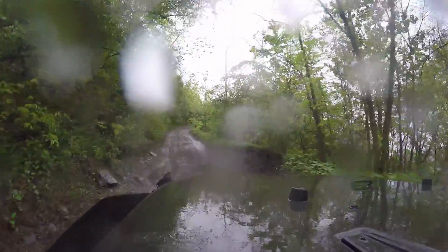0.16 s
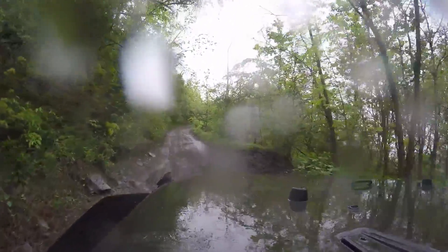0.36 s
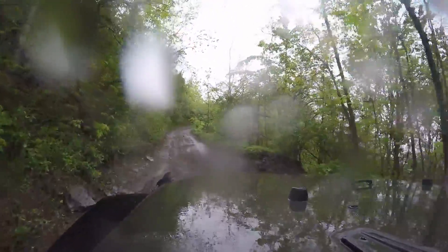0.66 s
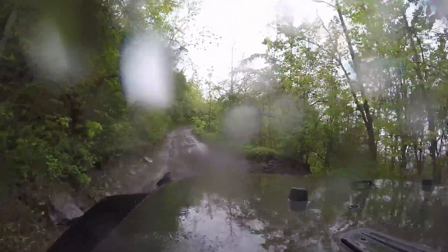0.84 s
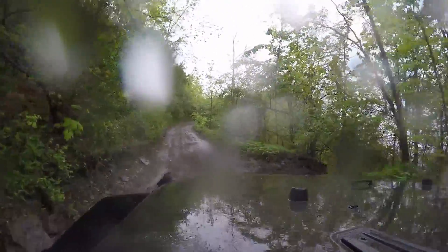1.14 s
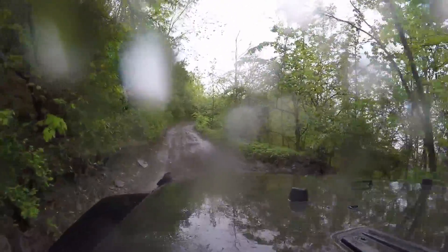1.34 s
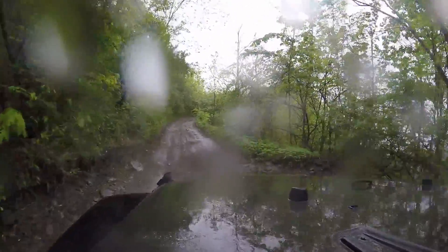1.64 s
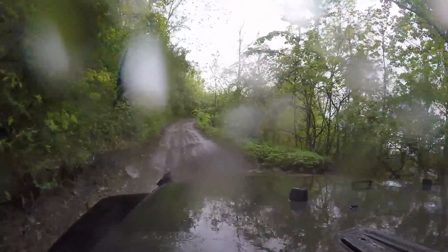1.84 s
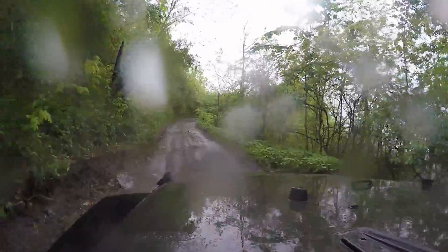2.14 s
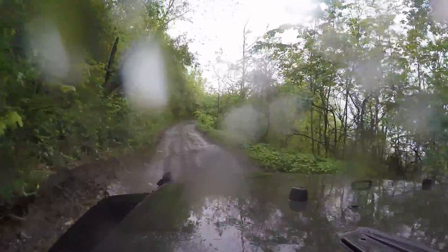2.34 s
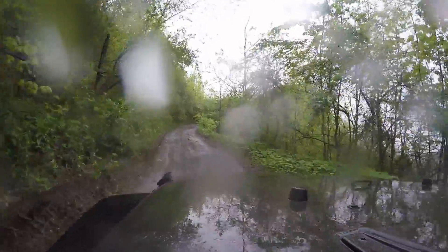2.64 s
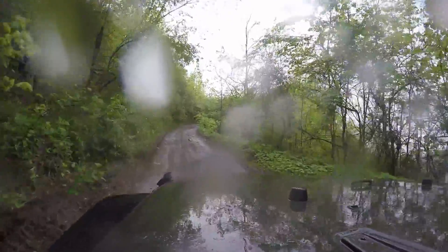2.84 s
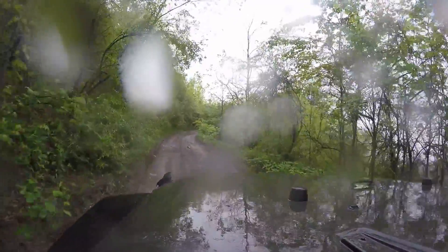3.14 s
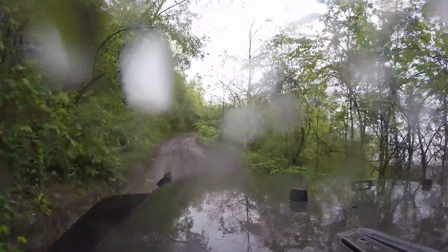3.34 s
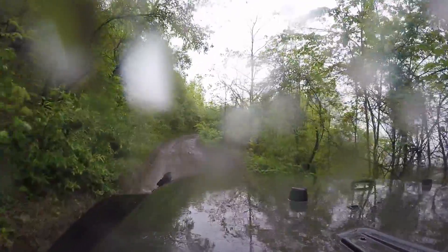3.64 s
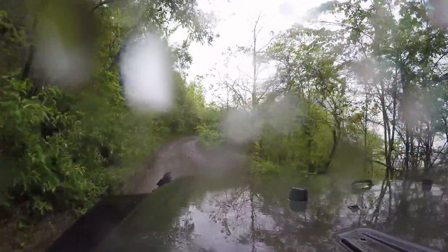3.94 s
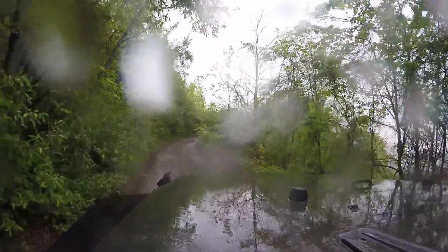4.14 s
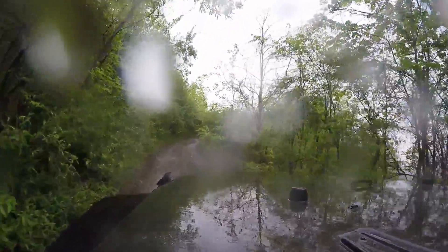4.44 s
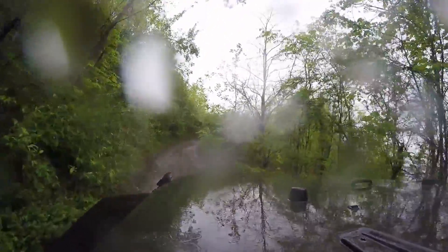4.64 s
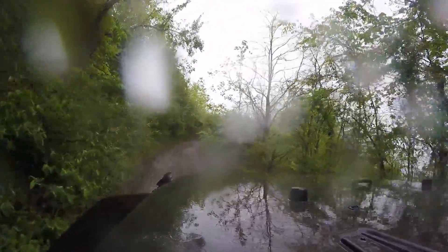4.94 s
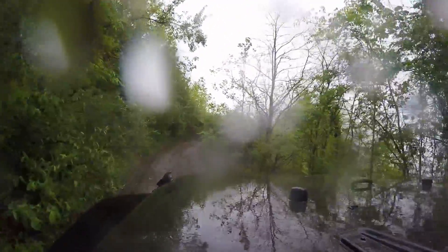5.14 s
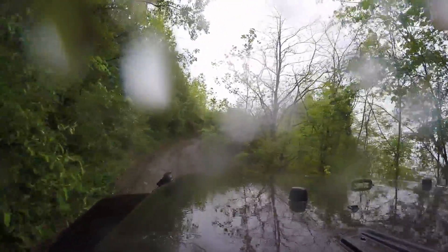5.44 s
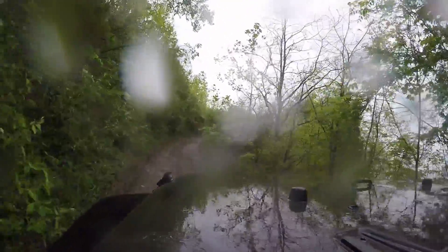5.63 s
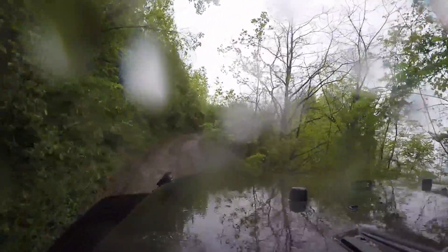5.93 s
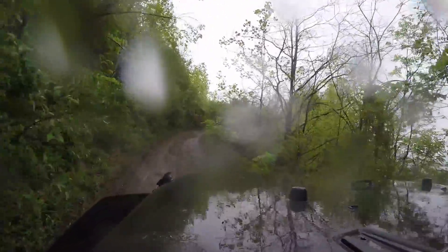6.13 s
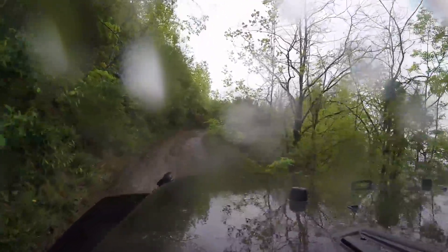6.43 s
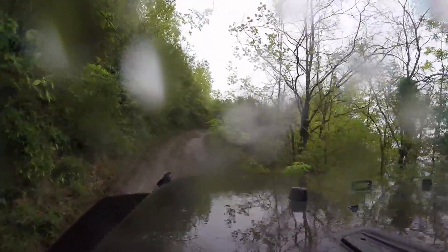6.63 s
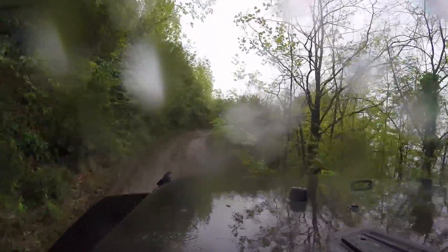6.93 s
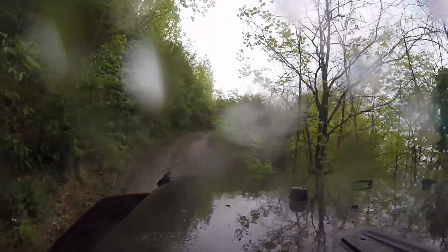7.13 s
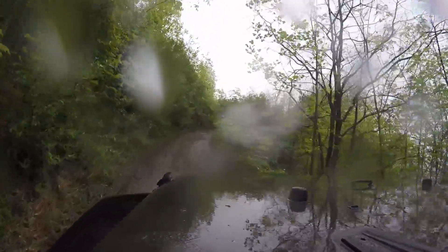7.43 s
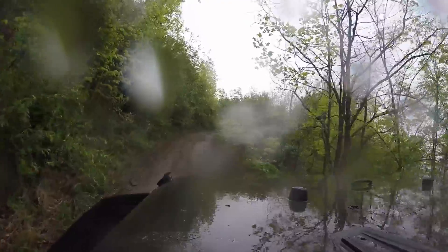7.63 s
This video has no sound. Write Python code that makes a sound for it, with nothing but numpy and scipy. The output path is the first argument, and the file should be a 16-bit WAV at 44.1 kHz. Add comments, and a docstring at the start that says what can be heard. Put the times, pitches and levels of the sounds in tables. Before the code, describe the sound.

Heavy low-frequency shaking and a soft engine drone dominate, with irregular bright raindrop ticks, faint wet hiss and a few rattling thumps.

```python
"""The body of a four-wheel-drive vehicle shakes at its lowest mode as it crawls along a muddy trail in the rain.
Engine firing orders swell as they cross body resonances, and noise bands at the body modes form the rumble.
Coloured noise with fine grains makes the hiss of rain and tyre spray; minimum-phase pulses make the drops.
Knocks, rustle and thumps are decaying panel and floor pan modes, with noise bursts of loose parts and water.
All is heard by one microphone in a sealed housing on the roof."""
import sys
import numpy as np
from scipy import signal
from scipy.fft import rfft, irfft, next_fast_len
from scipy.io import wavfile
from scipy.ndimage import uniform_filter1d

SR = 44100
rng = np.random.default_rng(int(sys.argv[2]) if len(sys.argv) > 2 else 0)


def unload_wav(signal):
    """Save mono or channel-first audio to the path in sys.argv[1] as 16-bit WAV at rate SR, clipped to [-1, 1]."""
    wavfile.write(
        sys.argv[1],
        SR,
        np.round(np.clip(np.atleast_2d(signal).T, -1, 1) * 32767).astype(np.int16),
    )


N = 343098

# Shudders of the body, each dying away as the next begins: start [t/s], rms level at the crest [level/dB],
# share of its length spent rising [1]
SHUDDERS = [(-0.03, -11.5, 0.56), (0.11, -17.5, 0.24), (0.36, -12.5, 0.78), (0.78, -13, 0.41),
            (1.0, -14.5, 0.19), (1.3, -18.5, 0.44), (1.42, -11.5, 0.35), (1.79, -14, 0.23),
            (2.5, -15.5, 0.28), (2.8, -16.5, 0.74), (2.99, -12.5, 0.37), (3.53, -23.5, 0.75),
            (3.76, -22.5, 0.39), (4.05, -19.5, 1), (4.24, -16.5, 0.5), (4.45, -13, 0.19), (4.94, -15, .45),
            (5.2, -13.5, 0.39), (5.4, -15.5, 0.64), (6.46, -12.5, 0.66), (6.92, -14, 0.4),
            (7.13, -12.5, 0.4), (7.33, -13.5, 0.92)]
# Pitch of the shake: time [t/s], frequency [f/Hz]
SHAKE_PITCH = [(0, 24.77), (5.2, 25.06), (5.4, 26.18), (7.78, 26.04)]
# Engine: time [t/s], firing rate [f/Hz], load on the first order [level/dB],
# second, third and fourth orders [level/dB each]
ENGINE_ORDERS = [(0.05, 46.5, -3.5, -60, -56.5, -79), (0.72, 47, -12, -61, -49.5, -50.5),
                 (0.85, 46.53, -13, -61, -62, -43.5), (1.12, 42.36, -10, -52, -56, -41.5),
                 (1.29, 36.8, -2.5, -38, -39, -64), (1.62, 34.07, -6, -33.5, -40.5, -47.5),
                 (2.5, 33.26, 1.5, -51, -42, -42), (2.95, 33.57, -21, -34.5, -39, -57),
                 (3.19, 36.1, -2, -56, -36.5, -53.5), (3.53, 44.46, 0.5, -56, -61, -40),
                 (3.76, 49.48, 0, -35.5, -51, -57), (4.07, 54.67, 8, -40, -52.5, -50.5),
                 (4.58, 57.65, -10, -45, -50.5, -69), (5.5, 58.26, -15, -44.5, -53.5, -65),
                 (5.9, 58.43, 2, -49, -50, -45.5), (6.12, 48.18, -21, -47, -60, -57),
                 (6.24, 43.07, -2, -52, -48, -33.5), (6.63, 36.02, -10, -46, -43, -61),
                 (6.86, 36.32, -1, -61, -52, -49), (7.1, 39.8, -4, -58, -50, -43),
                 (7.38, 43.43, 5, -68, -50, -34.5), (7.72, 47.24, -13, -62, -60, -45)]
# Body modes that carry the rumble: centre [f/Hz], width [f/Hz], relative strength [level/dB]
BODY_MODES = [(14.6, 10.5, 11.5), (36, 11, 6.5), (54.9, 15.6, -3), (71.7, 15.8, -4.5), (79.37, 4.16, -1.5),
              (107, 13, -9.5), (138.7, 20.3, -11.5), (183.5, 31, -17), (221.4, 33, -21), (268, 46, -22),
              (345, 30, -24), (414, 72, -28), (632, 4.1, -31.5), (800.7, 15, -26.5), (1028.7, 17.6, -29),
              (1768, 33, -25)]
# Wet trail under the tyres: time [t/s], hiss [level/dB], spray [level/dB], before flicker
TRAIL_LEVELS = [(0.0, -48.5, -59), (0.87, -48.5, -60.5), (1.17, -47.5, -58.5), (1.41, -48.5, -56.5),
                (2.51, -47, -57.5), (2.79, -47.5, -60.5), (3.03, -49.5, -62), (3.25, -49.5, -59),
                (3.44, -46, -61), (3.62, -50, -62.5), (4.72, -46.5, -65), (5.11, -51, -64.5),
                (5.92, -49, -63.5), (6.52, -48.5, -64), (7.34, -50.5, -66), (7.78, -49, -66.5)]
# Wet hiss as the housing passes it: frequency [f/Hz], relative density [level/dB per Hz]
HISS_SPECTRUM = [(260, -16), (450, -9.5), (531, -8.5), (614, -2), (791, -3.5), (906, -8), (1050, -5.5),
                 (1300, -7.5), (1520, -11), (1770, 2.5), (1900, 5), (2420, -3.5), (2640, -8.5), (3370, -6),
                 (3700, -17.5), (3950, -34), (4600, -34), (5980, -52), (10100, -120)]
# Spray and far rain: frequency [f/Hz], relative density [level/dB per Hz]
SPRAY_SPECTRUM = [(2350, -21), (4000, -1.5), (4680, -2.5), (6440, -8), (14200, -16.5), (15000, -18),
                  (15500, -48), (15700, -61), (16000, -50)]
# Clear drops on the housing: time [t/s], peak [level/dB], pitch where it lands [f/Hz],
# bright modes [level/dB], dull modes [level/dB]
CLEAR_DROPS = [(0.116, -37, 1770, -30, -25), (0.402, -39, 4230, -26, -35), (0.428, -30.5, 1770, -27, -28),
               (0.535, -15.5, 2150, -12, -22), (0.588, -26.5, 1810, -40, -17), (0.613, -31, 3420, -40, -30),
               (0.695, -30.5, 3860, -30, -30), (0.773, -21, 2160, -42, -32), (0.83, -33, 3200, -40, -30),
               (0.994, -15, 2070, -25, -19), (1.144, -32, 1830, -19, -22), (1.265, -21.5, 3000, -18.5, -16),
               (1.354, -6, 2500, -17.5, -21.5), (1.499, -30, 1730, -42, -26),
               (1.64, -10.5, 1730, -22.5, -19.5), (1.653, -21, 2820, -27, -21), (1.68, -26, 2700, -28, -14),
               (1.844, -25.5, 4550, -7, -16), (2.004, -23, 4600, -12, -35), (2.033, -20, 3930, -20, -20),
               (2.308, -28, 2366, -13, -30), (2.371, -27, 1910, -42, -34), (2.461, -23, 2804, -36, -17),
               (2.659, -18, 2814, -46, -30), (2.68, -22, 1940, -40, -14), (2.691, -25, 3020, -20, -13),
               (2.813, -26.5, 1950, -45, -35), (3.026, -26, 1720, -39, -34), (3.104, -30, 1910, -36, -32),
               (3.335, -27, 3040, -2, -26), (3.36, -27.5, 2600, -3, -27), (3.433, -36, 3800, -35, -30),
               (3.535, -27.5, 1787, -44, -12), (3.804, -19, 4060, -18, -18), (3.892, -29.5, 4060, -24, -17),
               (3.936, -18.5, 2098, -47, -34), (4.249, -26.5, 1746, -19, -23),
               (4.314, -8.5, 3755, -26.5, -12), (4.407, -32, 2770, -38, -24), (4.469, -5, 2570, -18, -21),
               (4.583, -31, 2480, -38, -21), (4.657, -46, 4500, -8, -30), (4.672, -29.5, 3820, -45, -16),
               (4.705, -33, 3415, -38, -27), (4.768, -32, 2445, -42, -32), (4.868, -25.5, 2210, -24, -6.5),
               (4.967, -22, 2003, -27, -36), (5.098, -34, 1900, -15, -24), (5.428, -23.5, 3910, -44, -30),
               (5.443, -28, 2284, -39, -24), (5.639, -29, 2002, -40, -28), (5.67, -21, 4630, -18, -17),
               (5.691, -37, 2400, -9, -28), (5.8, -46, 4500, -2, -30), (5.845, -42, 4460, -2, -30),
               (5.988, -28, 2410, -15, -24), (6.001, -38.5, 4500, -8, -30), (6.011, -32, 4160, -16, -26),
               (6.256, -40, 4320, -18, -30), (6.278, -28, 4300, -7, -28), (6.297, -38, 4564, -25, -30),
               (6.45, -38, 4500, -23, -30), (6.455, -23.5, 2230, -44, -31), (6.621, -22.5, 3750, -11, -35),
               (6.803, -23, 835, -44, -5), (6.909, -2.5, 1660, -7, -11.5), (6.96, -27, 4200, -10, -30),
               (7.1, -24, 1920, -47, -27), (7.161, -36, 4300, -22, -30), (7.296, -47, 2700, -38, -28),
               (7.504, -32, 3753, -10, -5), (7.577, -24, 2020, -44, -13), (7.637, -14, 1950, -24.5, -39)]
# Housing modes: frequency [f/Hz], relative strength [level/dB], 60 dB decay time [t/s]
HOUSING_MODES = [(524.1, -13, 0.0087), (870, -3, 0.018), (1240, 2, 0.0061), (1720, 8.5, 0.014),
                 (1925, 0, 0.034), (2404, 6, 0.017), (2795, 0, 0.016), (3110, -2, 0.023),
                 (3570, 1.5, 0.018), (3870, -3, 0.015), (4540, -6.5, 0.022), (5030, 4.5, 0.003),
                 (5960, -1.5, 0.0066), (6970, -4, 0.01), (7650, -4.5, 0.0075), (8340, -6, 0.0082),
                 (9100, -10, 0.0068), (9800, -5, 0.006), (10800, -5.5, 0.0046), (12200, -3.5, 0.0039),
                 (13800, -14, 0.0023), (15000, -5.5, 0.003)]
# Knocks, rustle and thumps of panels and floor; close rows can form one rustle or thump:
# time [t/s], nominal peak [level/dB], relative dull part [level/dB], floor boom [level/dB],
# floor knock [level/dB], ring length share [1], favoured dull and bright modes [f/Hz each]
KNOCKS = [(0.503, -35.5, -18, -70, -71, 1, 800, 2110), (0.56, -34, -22, -60, -58, 0.97, 800, 2100),
          (0.601, -29, -13.5, -50, -69, 1, 810, 2410), (0.655, -35, -7, -50, -60, 0.52, 800, 2100),
          (1.609, -36.5, 7, -19, -34.5, 0.72, 700, 1900), (1.633, -36, -19, -20, -39, 0.83, 700, 1920),
          (1.66, -31.5, -34, -16, -35.5, 0.68, 700, 1940), (1.689, -34, -6, -17, -44, 0.39, 700, 3200),
          (1.722, -40, -10, -24, -35, 0.82, 700, 1900), (1.975, -17.5, -11.5, -48, -39, 0.63, 1042, 2400),
          (2.055, -20, -3, -12, -18, 0.45, 820, 2130), (2.456, -33, 2, -60, -57, .5, 796, 2420),
          (2.66, -41, -20, -34, -61, 0.41, 800, 2800), (3.225, -32.5, -17, -31, -38, 0.63, 800, 1880),
          (3.383, -20.5, -5, -23.5, -35, 0.36, 647, 2360), (3.477, -36, -8, -60, -60, .6, 1035, 3400),
          (3.536, -33.5, -2, -60, -65, 0.34, 805, 1720), (4.903, -30.5, -21, -44, -65, 0.7, 800, 2400),
          (5.515, -34, -6, -60, -63, 0.88, 801, 1940), (5.575, -33, -20, -60, -60, 0.49, 780, 1900),
          (6.172, -10.5, -18, -22, -23, 0.82, 1110, 2300), (6.374, -30, -8, -45, -66, 0.38, 808, 1900),
          (6.453, -29, -12.5, -57, -55, 0.99, 657, 2300), (7.526, -36.5, -13, -60, -62, 1, 800, 1903),
          (7.623, -33.5, -40, -50, -49, 0.89, 800, 2100)]
# Panel modes: frequency [f/Hz], relative strength [level/dB], full 60 dB decay time [t/s]
PANEL_MODES = [(644, -6, 0.45), (706, -19, 0.15), (785, -14, 0.53), (821, -12, 0.4), (1050, -12, 0.38),
               (1110, -30, 0.27), (1210, -17, 0.21), (1404, -11.5, 0.34), (1674, -6.5, 0.32),
               (1705, -14, 0.21), (1782, 1.5, 0.42), (1866, -5.5, 0.32), (1950, -11, 0.33),
               (1950, -10, .25), (2066, -3, 0.25), (2200, -12, 0.17), (2333, -4, 0.14), (2355, -4.5, 0.18),
               (2448, -6, 0.21), (2810, -7.5, 0.14), (3200, -17, 0.12), (3390, -22, 0.14),
               (3500, -16, 0.14), (3820, -14.5, 0.16), (4200, -22, 0.17), (4500, -31, 0.11),
               (5500, -19, 0.066), (5510, -23, 0.12)]
# Floor pan modes: frequency [f/Hz], relative strength [level/dB], full 60 dB decay time [t/s]
PAN_MODES = [(107, 4.5, 0.38), (136, 4, 0.267), (163, -12.5, 0.088), (191, -4.5, 0.16), (237, -5, 0.21),
             (275.6, 2, 0.25), (333.6, 5, 0.28), (364, -4.5, 0.62), (428, -15.5, 0.69), (480, -49, 0.033)]

# Shake; a small fullness exponent gives a flat top, and the gap is the least level, relative to the crest
SHUDDER_END_S, SHUDDER_FULLNESS, SHUDDER_GAP_DB = 7.95, 0.96, -34
# First order at load 0, rate the mounts pass best, and half-gain distance from it
FIRING_DB, FIRING_BEST_HZ, FIRING_REACH_HZ = -20, 38.4, 6.55
RUMBLE_DB = -26.5
# Drops: middle modes at the landing pitch and their fall away from it
LANDING_DB, FALL_DB_PER_OCTAVE, FALL_MOST_DB = -12.5, 15, 9.5
SOFT_ABOVE_HZ, SOFT_DB_PER_OCTAVE = 8700, 8   # water is a soft striker: the highest modes get less
OWN_DB, OWN_T60_S = -11.5, 0.014   # the patch of housing under the drop rings at the landing pitch
SKIRT_OCTAVES = 0.32   # how far from its pitch a housing mode is still heard
SNAP_DB, SNAP_OCTAVES = -18.5, 0.54   # the drop's own broad snap, against the strongest part
SPLIT_SHARE, SPLIT_S = 0.5, 0.0012   # the drop breaks up: strength and spread of the second contact
PATTER_PER_S, PATTER_DB, PATTER_CLUMP_DB = 88, -49.5, 2.5   # median rate, least peak, spread of the rate
# Knocks
FAVOUR_DB, FAVOUR_OCTAVES = 9, 0.051   # panel modes near the favoured pitches ring louder
TICK_DB = -3   # first contact of a knock, heard through the housing like a dull drop
SPLASH_DB, SPLASH_T60_S = -39, 0.14   # water thrown off the struck panel, against the knock's peak


def amp(db):
    """Logarithmic level: decibels to amplitude gain."""
    return 10 ** (np.asarray(db) / 20)


def rms_one(x):
    """Normalisation of power: scales a signal to unit rms."""
    return x / np.sqrt(np.mean(x ** 2) + 1e-20)


def in_time(rows):
    """Linear interpolation: table columns become curves with one value a sample."""
    s, *columns = np.transpose(rows)
    return [np.interp(np.arange(N) / SR, s, c) for c in columns]


def drift(rate_hz):
    """Low-passed noise: a random curve of spread 1 from two equal poles at rate_hz."""
    pole = np.exp(-80 * np.pi * rate_hz / SR)   # one step spans 40 samples
    noise = rng.standard_normal(N // 40 + 2002)
    slow = signal.lfilter([1], [1, -2 * pole, pole * pole], noise)[2000:]
    return np.interp(np.arange(N) / 40, np.arange(len(slow)), rms_one(slow))


def coloured(x, spectrum):
    """Spectral shaping: multiplies a dense signal's spectrum by a level curve, then sets rms 1."""
    size = next_fast_len(N)
    hz, db = np.transpose(spectrum)
    log_hz = np.log(np.arange(1, size // 2 + 2) * SR / size)
    gain = amp(np.interp(log_hz, np.log(hz), db, -90, -90))
    return rms_one(irfft(rfft(x, size) * gain, size)[:N])


def add(out, s, sound):
    """Superposition: mixes a short sound in at time s."""
    i = round(s * SR)
    out[i:i + len(sound)] += sound[:N - i]


def struck(hz, db, t60, length_s, signs=None):
    """Modal superposition: decaying sines start together, with chance signs unless given; peak 1."""
    t = np.arange(round(length_s * SR)) / SR
    decay = amp(db[:, None] - 60 * t / t60[:, None])
    rings = decay * np.sin(2 * np.pi * hz[:, None] * t)
    if signs is None:
        signs = rng.choice([-1, 1], len(hz))
    sound = rings.T @ signs
    return sound / np.abs(sound).max()


def shake():
    """Amplitude modulation: the body's lowest mode sounds as a near sine whose level swells and sinks smoothly."""
    t = np.arange(N) / SR
    (hz,) = in_time(SHAKE_PITCH)
    start, db, rise = np.transpose(SHUDDERS)
    now = np.clip(np.searchsorted(start, t) - 1, 0, None)
    length = np.diff(np.append(start, SHUDDER_END_S))
    gone = np.clip((t - start[now]) / length[now], 0, 1)
    crest = np.clip(rise, 0.1, 0.9)[now]
    swell = np.sin(np.pi / 2 * np.minimum(gone / crest, (1 - gone) / (1 - crest))) ** SHUDDER_FULLNESS
    level = amp(db)[now] * np.maximum(swell, amp(SHUDDER_GAP_DB))
    smooth_level = uniform_filter1d(level, size=1800)   # about 41 ms
    return np.sqrt(2) * smooth_level * np.sin(2 * np.pi * np.cumsum(hz) / SR)


def engine():
    """Forced resonance: firing orders are loudest as they cross body modes; uneven burning makes them waver."""
    hz, load_db, *upper_db = in_time(ENGINE_ORDERS)
    mounts = 1 / (1 + ((hz - FIRING_BEST_HZ) / FIRING_REACH_HZ) ** 2)
    gains = [amp(FIRING_DB + load_db) * mounts, *amp(upper_db)]
    turn = 2 * np.pi * np.cumsum(hz) / SR
    out = np.zeros(N)
    for order, gain in enumerate(gains, 1):
        responses = [1 / np.hypot(1, (order * hz - mode_hz) / width)
                     for mode_hz, width, _ in BODY_MODES[1:8]]
        resonance = np.max(responses, axis=0) ** 0.68
        waver = amp(1.2 * drift(4.1))
        tone = np.sin(order * turn + 0.15 * drift(3.9))
        out += np.sqrt(2) * resonance * gain * waver * tone
    return out


def rumble(level_db):
    """Random excitation of resonances: rough ground drives every body mode with noise of its own."""
    out = np.zeros(N)
    for hz, width, db in BODY_MODES:
        band = signal.butter(2, [hz - width / 2, hz + width / 2], "band", fs=SR, output="sos")
        noise = signal.sosfilt(band, rng.standard_normal(N + SR))[SR:]   # skip the filter's first second
        out += amp(db + 2.84 * drift(3.1)) * rms_one(noise)
    return amp(level_db) * out / np.sqrt(len(BODY_MODES))


def wet_noise(spectrum, level_db, grain_per_s, grain_db, flicker_db):
    """Shot noise over a continuum: fine splashes of uneven size join a smooth, flickering hiss."""
    sizes = amp(3.4 * np.minimum(rng.exponential(1, N), 4)) * rng.choice([-1, 1], N)
    grains = rms_one(sizes * (rng.random(N) < grain_per_s / SR))
    mix = rng.standard_normal(N) + amp(grain_db) * grains
    flicker = drift(33.0) + 2.0 * drift(29.7)
    return amp(level_db + flicker_db * flicker) * coloured(mix, spectrum)


def minimum_phase(power):
    """Minimum phase: folding the cepstrum puts all energy of a power spectrum as early as it can come."""
    cepstrum = irfft(np.log(power) / 2)
    cepstrum[1:1024] *= 2
    return irfft(np.exp(rfft(cepstrum[:1025], 2048)))[:1400]


def drop(peak_db, pitch_hz, bright_db, dull_db):
    """Local modal excitation: modes near the landing pitch are favoured, over the drop's broad snap."""
    hz, db, t60 = np.transpose(HOUSING_MODES)
    fall_db = np.minimum(FALL_DB_PER_OCTAVE * np.abs(np.log2(hz / pitch_hz)), FALL_MOST_DB)
    share_db = np.select([hz < 1400, hz > 5000], [dull_db, bright_db], LANDING_DB - fall_db)
    levels = db + share_db + rng.normal(0, 2.0, len(hz))
    levels -= SOFT_DB_PER_OCTAVE * np.maximum(np.log2(hz / SOFT_ABOVE_HZ), 0)
    hz = hz * rng.normal(1, 0.012, len(hz))
    hz = np.append(hz, pitch_hz)
    levels = np.append(levels, OWN_DB)
    t60 = np.append(t60, OWN_T60_S)

    grid = np.arange(1, 1026)[:, None] * SR / 2048
    damping = np.log(1000) / t60
    modes = amp(2 * levels) / (damping ** 2 + (2 * np.pi * (grid - hz)) ** 2)
    skirt = 1 + (np.log2(grid / hz) / SKIRT_OCTAVES) ** 4
    power = np.sum(modes / skirt, axis=1)
    snap = np.exp(-(np.log2(grid[:, 0] / pitch_hz) / SNAP_OCTAVES) ** 2)
    power += power.max() * amp(2 * SNAP_DB) * snap   # doubled dB: amp() then gives a power ratio

    sound = minimum_phase(power)
    lag = 4 + int(rng.random() * SPLIT_S * SR)
    sound[lag:] += SPLIT_SHARE * sound[:-lag].copy()
    return amp(peak_db) * rng.choice([-1, 1]) * sound / np.abs(sound).max()


def rain():
    """Random arrivals: small drops patter in clumps at a drifting rate, among the clear drops."""
    out = np.zeros(N)
    for s, *kind in CLEAR_DROPS:
        add(out, s + 0.0011, drop(*kind))   # the pulse begins about a millisecond after the listed time
    chance = PATTER_PER_S * amp(PATTER_CLUMP_DB * drift(4.0)) / SR
    for i in np.flatnonzero(rng.random(N) < chance):
        size_db = 4.85 * min(rng.exponential(), 3.0)
        pitch_hz = 2500 * amp(rng.normal(0, 1.0))
        bright_db, dull_db = rng.normal([-40.0, -22.0], [6.0, 5.0])
        add(out, i / SR, drop(PATTER_DB + size_db, pitch_hz, bright_db, dull_db))
    return out


def panel_ring(dull_db, share, spot_hz):
    """Modal participation: panel modes near the favoured pitches ring louder."""
    hz, db, t60 = np.transpose(PANEL_MODES)
    nearness = np.exp(-(np.log2(hz[:, None] / spot_hz) / FAVOUR_OCTAVES) ** 2).sum(axis=1)
    db = db + FAVOUR_DB * nearness
    db = db + (dull_db + 5.0) * (hz < 1450) + rng.normal(0, 1.5, len(hz))
    return struck(hz, db, t60 * share, 0.45)


def knocks():
    """Impact excitation: panel modes ring, loose parts rustle and the floor pan booms at each knock."""
    out = np.zeros(N)
    t = np.arange(round(0.45 * SR)) / SR
    loose = coloured(rng.standard_normal(N), HISS_SPECTRUM)   # countless small modes, through the housing
    water = coloured(rng.standard_normal(N), SPRAY_SPECTRUM)
    dull_band = signal.butter(4, [620, 1200], "band", fs=SR, output="sos")
    dull = signal.sosfilt(dull_band, loose)
    for s, peak_db, dull_db, boom_db, knock_db, share, *spot_hz in KNOCKS:
        share = max(share, 0.1)
        i = round(s * SR)
        panel = panel_ring(dull_db, share, spot_hz)
        add(out, s, amp(peak_db - 1.0) * panel * np.minimum(t / 0.005, 1))
        add(out, s + 0.00203, drop(peak_db + TICK_DB, spot_hz[1], -34.0, dull_db - 8.0))

        shaken = (loose + (amp(dull_db + 18.5) - 1) * dull)[i:i + len(t)]
        dying = np.minimum(t / 0.016, 1) * amp(-60 * t / (0.23 * share))
        add(out, s, amp(peak_db - 10.5) * rms_one(shaken) * dying[:len(shaken)])

        splash = water[i:i + len(t)]
        splash_db = peak_db + SPLASH_DB - 60 * t[:len(splash)] / SPLASH_T60_S
        add(out, s, amp(splash_db) * splash)

        hz, db, t60 = np.transpose(PAN_MODES)
        db = db + rng.normal(0, 1.5, len(hz))
        for level_db, part in (boom_db, hz < 250), (knock_db, hz > 250):
            ring = struck(hz[part], db[part], t60[part] * share, 0.45, signs=np.ones(part.sum()))
            add(out, s, amp(level_db) * ring * np.minimum(t / 0.0056, 1))
    return out


def scene():
    """Linear superposition: all sources add at the one microphone."""
    hiss_db, spray_db = in_time(TRAIL_LEVELS)
    vehicle = shake() + engine() + rumble(RUMBLE_DB)
    hiss = wet_noise(HISS_SPECTRUM, hiss_db, grain_per_s=320.0, grain_db=-13.0, flicker_db=1.5)
    spray = wet_noise(SPRAY_SPECTRUM, spray_db, grain_per_s=350.0, grain_db=-11.5, flicker_db=0.7)
    return (vehicle + hiss + spray + rain() + knocks())[None]


def record(dry):
    """Band limitation: a steep low-pass holds everything above 17 kHz at least 70 dB down."""
    return signal.sosfilt(signal.cheby2(12, 70, 17000, fs=SR, output="sos"), dry)


dry = scene()
out = record(dry)
unload_wav(out)
```